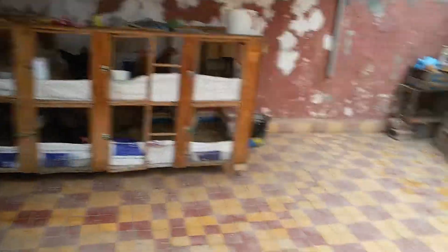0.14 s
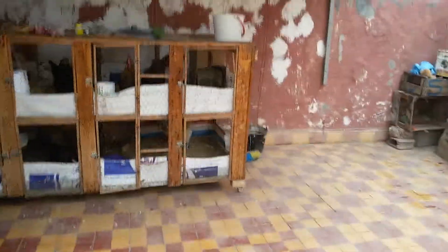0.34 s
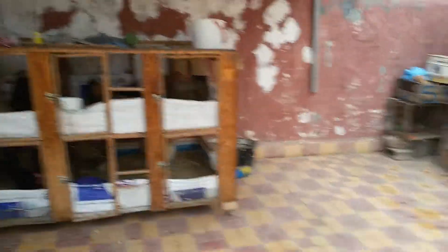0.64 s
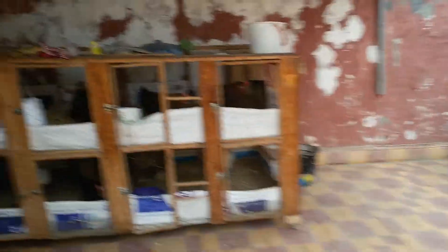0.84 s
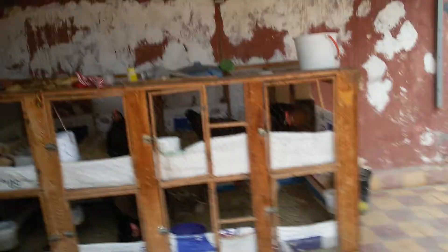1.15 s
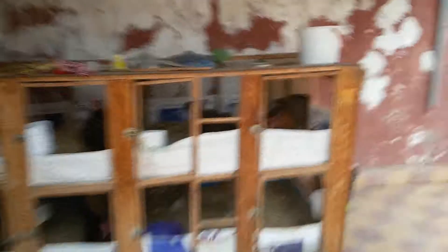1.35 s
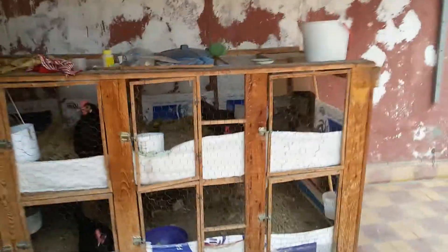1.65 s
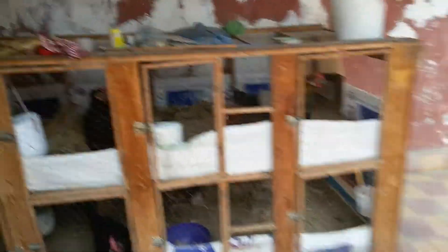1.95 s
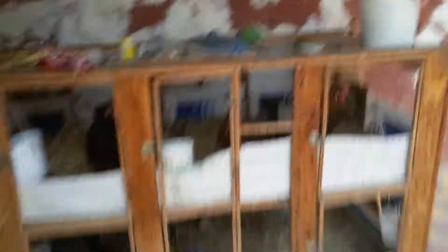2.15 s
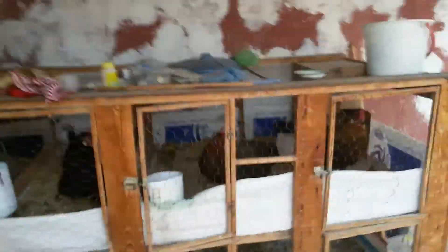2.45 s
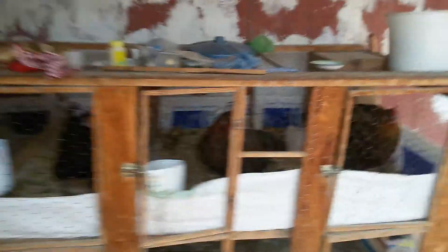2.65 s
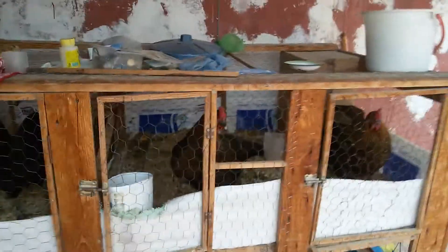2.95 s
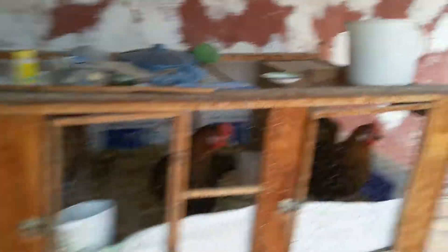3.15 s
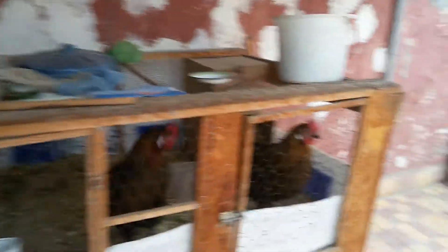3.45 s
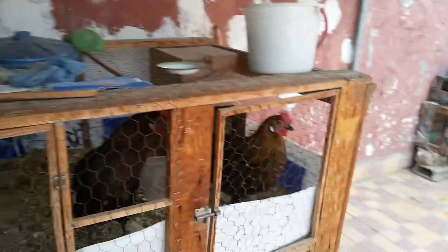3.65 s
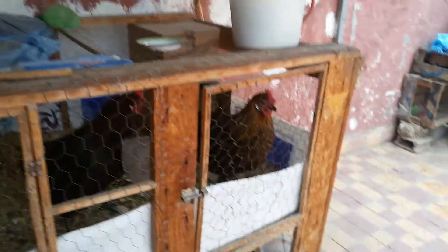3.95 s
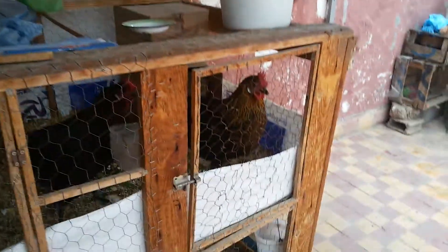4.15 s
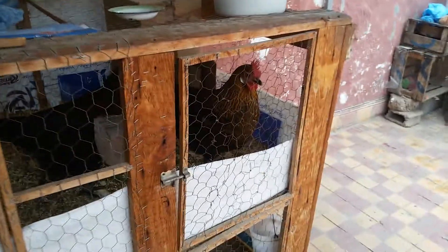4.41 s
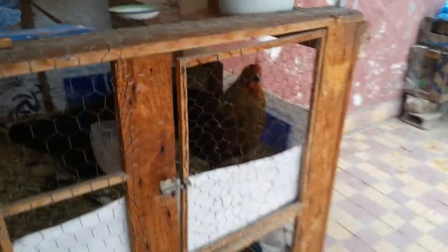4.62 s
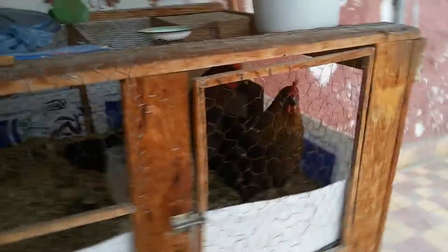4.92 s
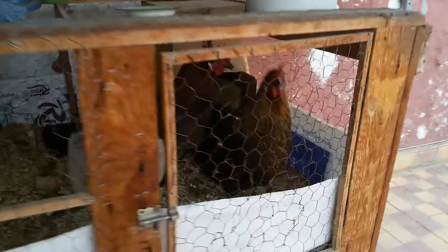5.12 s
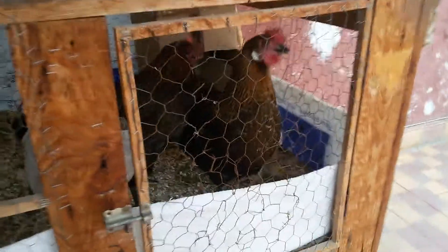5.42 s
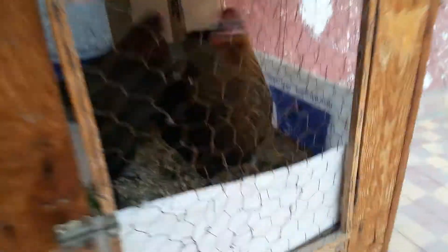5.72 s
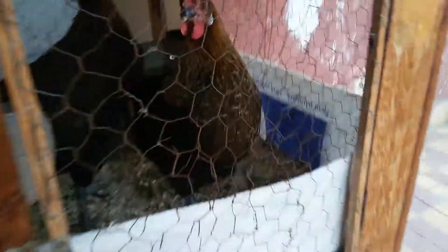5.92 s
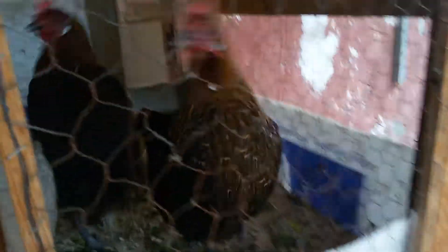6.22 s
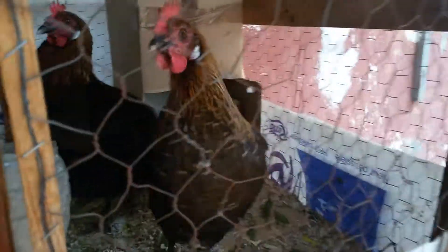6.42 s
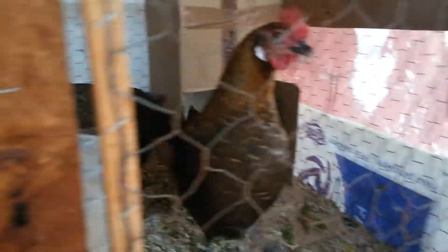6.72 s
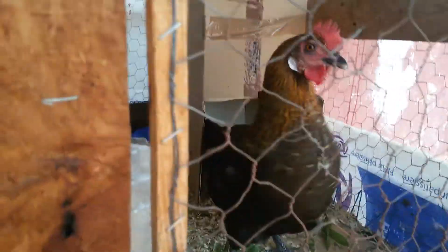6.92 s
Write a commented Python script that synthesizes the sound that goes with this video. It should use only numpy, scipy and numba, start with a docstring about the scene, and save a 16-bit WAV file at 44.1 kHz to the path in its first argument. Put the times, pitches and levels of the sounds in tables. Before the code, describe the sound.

Drawn-out, nasal hen calls get closer and stronger, with rough low clucks, litter scratches, small ticks and a faint distant tool whine behind.

```python
"""A hen in a wooden coop gives long rising calls, louder as the phone comes close: sine partials and breath.
A second hen clucks and growls lower: uneven pulses ring bands that stand for its throat and chest.
Feet scratch (grainy noise), beaks and claws tick (tiny noise bursts) and dull knocks fall (fading sines).
Behind them a far tool whines and thin hisses pass (narrow noise), a low drone wavers (one sine),
and a walled yard rumbles (many noise bands). Boards and walls echo the hens and feet."""
import sys
import numpy as np
from scipy import signal
from scipy.io import wavfile
from scipy.ndimage import uniform_filter1d
from numba import njit

SR = 44100
rng = np.random.default_rng(int(sys.argv[2]) if len(sys.argv) > 2 else 0)


def dump(signal):
    """Clip the signal to [-1, 1] and save it as 16-bit WAV at the path in sys.argv[1]."""
    limited = np.clip(np.atleast_2d(signal).T, -1, 1)
    pcm = np.round(limited * 32767).astype(np.int16)
    wavfile.write(sys.argv[1], SR, pcm)


N = 311771  # length in samples


def undb(db):
    """Turn decibels into a plain loudness factor."""
    return 10 ** (np.asarray(db) / 20)


def unit(x):
    """Scale a sound to an average (RMS) level of 1."""
    return x / np.sqrt(np.mean(x ** 2) + 1e-18)


def colour(table, hz):
    """Read the dB at a pitch from a (Hz, dB) table, joined on a log-frequency axis."""
    f, db = np.transpose(table)
    return np.interp(np.log(hz), np.log(f), db)


def span(table):
    """Give the stretch of samples a timed table covers, and its columns with one value a sample."""
    s, *columns = np.transpose(table)
    a, b = int(s[0] * SR), min(int(s[-1] * SR), N)
    return slice(a, b), [np.interp(np.arange(a, b) / SR, s, c) for c in columns]


@njit
def svf(x, hz, width):
    """Let through a band whose centre and width may move; the gain is 1 at the centre."""
    y, b, l = np.empty(len(x)), 0., 0.
    for i in range(len(x)):
        g, k = np.tan(np.pi * hz[i] / SR), width[i] / hz[i]
        v = (b + g * (x[i] - l)) / (1 + g * (g + k))
        b, l, y[i] = 2 * v - b, l + 2 * g * v, k * v
    return y


def band(x, hz, width):
    """Band-pass a sound; centre and width in Hz may be single numbers or one value a sample."""
    return svf(x, hz + 0 * x, width + 0 * x)


def walk(rate, n=N):
    """Wander at random: levels held 1 / rate seconds and smoothed twice, with a spread near 1."""
    k = max(int(SR / rate), 1)
    held = np.repeat(rng.standard_normal(n // k + 1), k)
    return 1.605 * uniform_filter1d(uniform_filter1d(held, k), k)[:n]


def fade(n, rise_s, fall_s):
    """Make a straight rise at the start and a straight fall at the end."""
    t = np.arange(n) / SR
    return np.clip(t / rise_s, 0, 1) * np.clip((n / SR - t) / fall_s, 0, 1)


def calls(flutter_db=.9, rasp_db=2.6, breath_db=-12.5):
    """Partials of the syrinx pulse; strong-weak pulses add lines halfway between; breath hisses once a cycle."""
    # The four lowest partials, one table a call.
    # Each row: time in seconds, then levels in dB of the 2nd, 1st, 3rd and 4th partial, before they flutter.
    partial_levels = [
        [(0.51, -49, -45, -56, -56), (0.524, -40, -40, -51, -55), (0.544, -43, -44, -45, -53),
         (0.568, -45, -49, -45, -58), (0.62, -38, -42.5, -47, -60), (0.678, -35.5, -37, -42, -65),
         (0.702, -36, -38, -41.5, -55), (0.768, -42, -39.5, -43, -60), (0.802, -39, -40.5, -38, -54),
         (0.882, -40, -41, -52, -42), (0.96, -46, -43, -47, -41), (0.98, -45, -43, -44, -63),
         (1.01, -49, -41, -45, -41), (1.03, -36, -51, -43, -45), (1.05, -41.5, -56, -43, -41),
         (1.1, -56, -38, -50, -54)],
        [(1.29, -39, -46, -57, -61), (1.312, -38, -46, -42, -51), (1.332, -37, -47, -49, -43),
         (1.358, -34, -35.5, -43, -47), (1.384, -38, -41, -34, -48), (1.41, -35, -42, -40, -48),
         (1.424, -35, -37, -40, -54), (1.456, -41, -42, -36, -41), (1.474, -29, -40, -41, -43),
         (1.492, -31, -42, -51, -58), (1.51, -42, -36, -49, -56)],
        [(2.018, -32, -36, -55, -59), (2.034, -27, -33, -45, -44.5), (2.06, -34.5, -37, -44, -41),
         (2.088, -29, -34, -44, -45.5), (2.148, -33.5, -31, -46, -39), (2.192, -26.5, -32.5, -41.5, -42),
         (2.232, -27.5, -30, -41, -55), (2.254, -27.5, -44, -46, -51), (2.274, -28.5, -32, -42, -57),
         (2.332, -25, -35, -41.5, -46), (2.356, -25.5, -34, -40, -39), (2.376, -34, -43, -45, -48),
         (2.404, -26, -53, -40.5, -51), (2.436, -23, -32.5, -43, -50), (2.474, -25, -57, -44, -50),
         (2.5, -30, -53, -45, -56)],
        [(2.793, -35, -38, -47, -54), (2.803, -25, -35, -41, -41), (2.819, -26, -29.5, -43, -35),
         (2.845, -40, -46, -44, -49.5), (2.875, -32.5, -37, -41, -41), (2.937, -35, -29.5, -37, -44),
         (2.955, -38, -32, -36, -49), (2.977, -31, -33, -44, -40), (3.003, -22.5, -41, -36.5, -36.5),
         (3.041, -25, -51, -36, -34.5), (3.069, -30, -34.5, -39.5, -40), (3.137, -32, -44, -35, -39.5),
         (3.227, -25.5, -35, -36, -36), (3.247, -26.5, -36, -37.5, -38), (3.277, -27, -34.5, -34.5, -36.5),
         (3.31, -19, -33, -40, -46)],
        [(3.505, -31, -33, -50, -50), (3.521, -22.5, -47, -39, -39), (3.539, -38, -44, -38, -30.5),
         (3.555, -26.5, -46, -37, -39), (3.581, -20.5, -42, -38, -35), (3.605, -29.5, -47, -32, -36),
         (3.643, -22, -48, -31, -39), (3.669, -21.5, -44, -30, -32), (3.689, -19.5, -39, -39, -37),
         (3.705, -23, -35, -44, -42), (3.72, -37, -42, -48, -47)],
        [(4.115, -30, -47, -47, -53), (4.129, -24.5, -40, -37.5, -30), (4.145, -34, -44, -46, -27.5),
         (4.167, -28, -32.5, -36, -40), (4.201, -36.5, -46, -39, -31.5), (4.221, -25.5, -38, -35, -36.5),
         (4.327, -28, -36.5, -30.5, -34.5), (4.359, -22.5, -33, -30.5, -43.5), (4.417, -16.5, -41, -28.5, -37),
         (4.483, -22, -39.5, -31.5, -42), (4.511, -19, -35.5, -36, -35.5), (4.547, -19.5, -30.5, -30.5, -32.5),
         (4.575, -19, -32.5, -35, -31), (4.667, -17.5, -33, -30.5, -33.5), (4.677, -22, -32, -39, -38),
         (4.71, -39, -29, -46, -38)],
        [(4.955, -26, -38, -53, -45), (4.965, -20, -31, -38, -36.5), (4.981, -17.5, -44, -28, -32.5),
         (5.001, -28, -44, -38, -34.5), (5.035, -21, -35, -37, -30), (5.069, -27, -32, -30.5, -41),
         (5.117, -20, -31.5, -29, -36), (5.131, -25, -33, -25, -28), (5.157, -27.5, -32, -27.5, -35),
         (5.195, -14.5, -27.5, -35, -31.5), (5.229, -15.5, -27.5, -26, -31), (5.265, -18.5, -31, -29.5, -28),
         (5.281, -13.5, -34, -23, -28), (5.305, -22, -26.5, -46, -34.5), (5.32, -33, -36, -47, -45)],
        [(5.555, -24, -37, -49, -42), (5.563, -21.5, -34.5, -36, -30.5), (5.583, -27.5, -40, -35.5, -29.5),
         (5.607, -25, -38, -41, -29), (5.625, -27, -37, -34, -29), (5.645, -33, -35, -30, -30),
         (5.673, -24.5, -34, -31, -28), (5.713, -31, -36, -33, -28), (5.741, -26.5, -34, -32, -36),
         (5.769, -27.5, -30, -32, -26.5), (5.805, -41.5, -37, -31, -30), (5.829, -23, -38, -34, -38.5),
         (5.84, -30, -52, -45, -41)],
        [(6.142, -22, -35, -40, -36), (6.16, -19, -34, -36, -24.5), (6.194, -24.5, -29, -37, -25),
         (6.214, -20.5, -34, -32, -25.5), (6.246, -23.5, -31.5, -28.5, -29.5), (6.272, -26, -32, -30.5, -29),
         (6.36, -25, -39, -28, -29), (6.386, -15.5, -36, -31, -24.5), (6.458, -18.5, -33.5, -28, -26.5),
         (6.478, -33.5, -39.5, -30.5, -28), (6.498, -7.5, -36, -24, -24.5), (6.526, -19, -32.5, -28, -27),
         (6.55, -17, -35, -27, -29), (6.564, -18, -31.5, -31, -23.5), (6.598, -16, -30.5, -28.5, -29),
         (6.615, -24, -23, -21, -21)],
    ]
    # The steady part of the pitch, one table a call. Each row: time in seconds, pitch in Hz.
    pitches = [
        [(0.55, 535.6), (0.584, 515), (0.6, 548), (0.61, 525.3), (0.704, 522.4), (1.048, 542.3), (1.08, 524)],
        [(1.31, 507), (1.434, 532), (1.49, 534)],
        [(2.035, 510), (2.101, 534), (2.225, 546.3), (2.271, 572.7), (2.363, 585), (2.417, 615), (2.48, 624)],
        [(2.81, 531.6), (2.876, 532.6), (2.884, 522.3), (3.044, 554.6), (3.072, 577.7), (3.09, 569),
         (3.285, 590.6)],
        [(3.53, 543.7), (3.552, 566.4), (3.57, 584), (3.596, 582), (3.618, 571.4), (3.695, 582)],
        [(4.135, 526.8), (4.219, 555), (4.227, 546.2), (4.399, 561.3), (4.463, 568.4), (4.521, 595.6),
         (4.67, 583.3)],
        [(4.975, 540), (5.045, 560.8), (5.189, 595), (5.29, 595)],
        [(5.575, 534), (5.701, 571.4), (5.803, 576.4), (5.82, 569)],
        [(6.165, 535.2), (6.383, 585.8), (6.595, 593.2)],
    ]
    # How bright and how uneven each call is, against its effort. Each row: upper partials in dB at the start
    # and at the end, half-way lines in dB at the start and at the end.
    brightness = [(-21, -6, -17, -5), (-18, -2, -16, -8), (-7.5, 3.5, -20, -27), (-5, -4, -11, -9),
                  (-5.5, -8, -34, -19), (-11, 1.5, -17.5, -23), (-2, -5, -22, -23.5), (-3, -3, -22, -4),
                  (-1, -5.5, -21, -12.5)]
    # Beak resonance of each call, strongest in the seventh.
    # Each row: centre in Hz at the start, centre in Hz at the end, boost in dB.
    beaks = [(3300, 3000, 8), (3300, 3300, 9), (4050, 4100, 10), (3880, 4100, 7.5), (3980, 3840, 11),
             (3890, 3590, 12), (3710, 3900, 16), (3800, 3960, 9.5), (3850, 3780, 8)]
    # How the throat colours the upper partials and half-way lines. Each row: frequency in Hz, gain in dB.
    throat = [(250, -43.5), (900, -11), (1450, -4), (2100, 4.5), (2950, -23.5), (3500, -11.5), (4200, -13),
              (4700, -8.5), (5500, -26.5), (7000, -26.5), (9300, -35.5), (10500, -67)]
    onset_drop_hz, onset_s = 70.3, 0.008  # each call starts sharp and drops onto its pitch
    end_rise_hz, end_s = 32.4, 0.013  # and breaks upward as it stops
    break_db, break_s = 14, .03  # the voice turns hoarse as it stops
    halfway_fall_db = 13  # half-way lines weaken per step away from the 2.5th
    wander_db = 1.7  # each low partial swells and sinks a little on its own
    attack_s, release_s = 0.010, 0.016

    out = np.zeros(N)
    for call, pitch, ends, (*beak, beak_db) in zip(partial_levels, pitches, brightness, beaks):
        at, (second, first, third, fourth) = span(call)
        effort = 10 * np.log10(undb(2 * third) + undb(2 * fourth))  # 3rd and 4th partials together
        n = len(second)
        t = np.arange(n) / SR
        hz = np.interp(call[0][0] + t, *np.transpose(pitch))
        hz = hz + onset_drop_hz * np.exp(-t / onset_s) + end_rise_hz * np.exp((t - t[-1]) / end_s)
        upper, alternate = np.linspace(ends[::2], ends[1::2], n).T
        upper = effort + upper
        flutter = flutter_db * walk(140.1, n)  # the low partials flutter together
        halfway = effort + np.median(second - effort) + alternate
        beak_hz = np.linspace(*beak, n)
        waver = .001 * walk(45, n) + .005 * walk(260, n)  # small shakes of the pitch
        cycles = np.cumsum(hz * (1 + waver)) / SR

        voice = np.zeros(n)
        for k in np.arange(.5, 17.5, .5):
            if k > 4.5:  # the upper partials rasp, each on its own
                db = upper + 0.49 * alternate * (k % 1 > 0) + colour(throat, k * hz) + rasp_db * walk(200, n)
                db += beak_db * np.exp(-((k * hz - beak_hz) / 280) ** 2)
            elif k % 1:  # half-way lines among the low partials
                db = halfway - halfway_fall_db * abs(k - 5 / 2)
                db = db + colour(throat, k * hz) + rasp_db * walk(37.0, n)
            else:
                db = [first, second, third, fourth][int(k) - 1]
                db = db + np.sqrt(k) * flutter + wander_db * walk(60, n)
            phase = 2 * np.pi * k * cycles + rng.uniform(-1.3, 1.3)
            voice -= undb(db) * np.sqrt(2) * np.cos(phase)

        puff = rng.standard_normal(n) * (1 + np.sin(2 * np.pi * cycles))
        breath = unit(band(band(puff, 3750, 590), 4100, 1200)) + 0.023 * unit(band(puff, 3500, 2900))
        low_breath = unit(band(band(puff, 2 * hz, 310), 2 * hz, 830))
        low_breath = low_breath + 0.53 * unit(band(band(puff, 700, 1200), 700, 1200))
        hoarse_db = second - 22.0 + break_db * np.exp((t - t[-1]) / break_s)
        voice = voice + undb(upper + breath_db) * breath + undb(hoarse_db) * low_breath
        out[at] += fade(n, attack_s, release_s) ** 2 * voice
    return out


def growls(noise=0.6, patchy_db=4):
    """Uneven pulses of the second hen ring two throat bands and, faintly, the chest."""
    # The long growl. Each row: time in seconds, pulse rate in Hz, level in dB, roughness from 0 to 1,
    # lower throat band in Hz, upper throat band in Hz.
    long_growl = [(2.84, 183, -39, 0.7, 734, 890), (2.87, 181.2, -33, 0.88, 730, 880),
                  (2.91, 176, -36, 0.4, 700, 900), (2.96, 167.5, -38, 0, 660, 960),
                  (3.02, 160.6, -34.5, 0.08, 510, 980), (3.18, 165.5, -33, 0.04, 514, 910),
                  (3.24, 178.5, -30.5, 0.58, 600, 895), (3.27, 214.6, -31, 0.82, 595, 830),
                  (3.31, 233, -28, 0.75, 675, 947), (3.355, 240, -30.5, 0.75, 730, 935),
                  (3.39, 234, -32, 0.5, 646, 955), (3.42, 229.4, -32, 0.88, 640, 924),
                  (3.49, 226.6, -31, 0.8, 692, 867), (3.54, 200.6, -35.5, 0.98, 647.4, 794),
                  (3.6, 198.5, -29, 0.75, 700, 834), (3.645, 200.1, -35.5, 0.58, 735, 890),
                  (3.67, 199, -42, .6, 600, 800), (3.73, 198, -45, .6, 590, 790)]
    # Short clucks. Each row: start in seconds, length in seconds, level in dB, pulse rate in Hz at the start,
    # pulse rate in Hz at the end, roughness from 0 to 1, lower throat band in Hz.
    short_clucks = [(0.306, 0.11, -43, 201.3, 213, 0.9, 770), (1.276, 0.044, -40.5, 137, 131.7, 0.76, 626),
                    (1.363, 0.098, -40.5, 137.4, 141.2, 0.54, 657), (1.474, 0.065, -34, 269.5, 290, 1, 600),
                    (1.535, 0.043, -40, 229, 248, 0.14, 685), (1.654, 0.064, -36.5, 269.5, 261, 0.84, 605),
                    (1.836, 0.097, -37, 236, 266.3, 0.74, 623), (3.753, 0.14, -31, 215.8, 306, 0.4, 670),
                    (3.883, 0.079, -33.5, 214.8, 239.6, 0.85, 655)]
    ring_hz = 150  # width of the first filter of each throat band

    out = np.zeros(N)
    for growl in [long_growl] + [cluck(*row) for row in short_clucks]:
        at, (hz, db, rough, low_hz, high_hz) = span(growl)
        n, rough = len(hz), np.clip(rough, 0, 1)
        waver = rough * (.045 * walk(160, n) + .008 * walk(25, n))
        cycles = np.cumsum(hz * (1 + waver)) / SR
        weak = 4 * rough * (np.floor(cycles) % 2)  # a rough voice goes strong-weak
        pulses = np.diff(np.floor(cycles), prepend=0) * undb(3 * rough * walk(90, n) - weak)
        pulses = np.sqrt(SR / hz) * pulses + noise * rough * rng.standard_normal(n)
        low, high = (band(band(pulses, f, ring_hz), f, 260) * undb(patchy_db * rough * walk(30, n))
                     for f in (low_hz, high_hz))
        chest = band(band(pulses, 245.0, 110), 310, 97)
        voice = low - high + 1.1 * chest
        voice = voice + .22 * band(band(pulses, 1170, 300), 1170, 300)
        voice = voice + .08 * band(band(pulses, 1800, 700), 1800, 700)
        out[at] += undb(db) * unit(voice)
    return out


def cluck(start, length, db, hz0, hz1, rough, low_hz):
    """Controls of one cluck: it swells, holds and fades while the pulse rate glides."""
    rise, fall, edge_db = 0.11, 0.2, -1  # rise and fall are shares of the length
    upper_throat_hz = 844
    shape = [(0, edge_db), (rise, 0), (1 - fall, 0), (1, edge_db)]
    return [(start + u * length, hz0 + u * (hz1 - hz0), db + d, rough, low_hz, upper_throat_hz)
            for u, d in shape]


def burst(start, length, db, hz, width, grit_db):
    """Dense grains of uneven size in one band, swelling and fading."""
    n = int(max(length, .005) * SR)
    grains = rng.standard_normal(n) * undb(grit_db * walk(430, n))
    out, a = np.zeros(N + n), int(start * SR)
    out[a:a + n] = undb(db) * unit(band(grains, hz, width)) * fade(n, 0.1 * length, .5 * length)
    return out[:N]


def scratches():
    """Feet scratch the litter: many small rubs blur into grainy noise, bright with a weaker low part."""
    # Each row: start in seconds, length in seconds, level in dB before fading and further filtering.
    strokes = [(1.638, 0.12, -42.5), (1.895, 0.046, -38.5), (2.86, 0.048, -31.5), (3.217, 0.037, -34.5),
               (5.422, 0.046, -43.5), (5.684, 0.17, -32.5), (6.27, 0.17, -36.5), (6.775, 0.016, -33.5),
               (6.796, 0.039, -36.5), (6.85, 0.017, -45)]
    bright_hz = 4500
    out = np.zeros(N)
    for s, length, db in strokes:
        bright = burst(s, length, db, bright_hz, 2600, 1.6)
        out += band(band(bright, bright_hz, 4000), 2700, 6000)
        out += burst(s, length, db - 10, 1300, 1600, 3)
    return out


def ticks():
    """Beaks and claws hit wood and wire: a click with fast-dying noise, over a lower knock of the board."""
    # Each row: time in seconds, peak level in dB, centre of the bright part in Hz.
    taps = [(.159, -34, 3500), (0.262, -27, 4950), (0.316, -27, 2490), (0.394, -32, 3460),
            (0.594, -24.5, 1500), (0.908, -29, 3484), (1.014, -30, 4570), (1.198, -27, 2670),
            (1.621, -32, 2970), (1.765, -30, 5500), (1.913, -43, 4470), (2.059, -29, 5500),
            (2.617, -27, 1950), (2.636, -24, 5100), (2.685, -31, 2984), (2.949, -30, 3800),
            (3.083, -43, 4478), (3.942, -30.5, 5430), (4.298, -23, 3970), (6.03, -23, 4500),
            (6.032, -30, 3200), (6.034, -31.5, 2500), (7.0028, -24.5, 4400)]
    width_hz, decay_s, knock_hz = 2400, .0012, 1100
    out = np.zeros(N)
    t = np.arange(int(.15 * SR)) / SR
    for s, db, hz in taps:
        hit = (rng.standard_normal(len(t)) + 4 * (t == 0)) * np.exp(-t / decay_s)
        bright = band(band(hit, hz, width_hz), hz, width_hz)
        board = band(band(hit, knock_hz, knock_hz), knock_hz, knock_hz)
        tick = bright + .6 * board
        a = int(s * SR)
        out[a:a + len(t)] += (undb(db) * tick / np.abs(tick).max())[:N - a]
    return out


def knocks():
    """A few dull knocks: each is one sine that dies away."""
    # Each row: time in seconds, level in dB before fading, pitch in Hz, seconds to die away by 60 dB.
    thuds = [(.59, -3, 810, 0.0085), (2.91, -28, 98, 0.21), (3.941, -11, 200, 0.035),
             (6.299, -32, 256, 0.071)]
    out = np.zeros(N)
    t = np.arange(int(.15 * SR)) / SR
    for s, db, hz, t60 in thuds:
        a = int(s * SR)
        ring = np.sin(2 * np.pi * hz * t) * np.exp(-np.log(1000) * t / t60)
        out[a:a + len(t)] += undb(db) * ring * fade(len(t), .008, .01)
    return out


def echoes(x):
    """Scattered reflections: short and bright from the coop boards, long and dull from the yard walls."""
    # First the coop boards, then the yard walls. Each row: seconds to die away by 60 dB,
    # level in dB of the whole tail, centre in Hz, width in Hz.
    reflections = [(.18, -14, 2600, 4000), (.42, -27, 1300, 1600)]
    t = np.arange(int(.6 * SR)) / SR
    tail = 0
    for t60, db, hz, width in reflections:
        scatter = rng.standard_normal(len(t)) * np.exp(-np.log(1000) * t / t60)
        scatter = band(scatter * fade(len(t), 0.00077, 0.013), hz, width)
        tail = tail + undb(db) * scatter / np.sqrt(np.sum(scatter ** 2))
    return signal.fftconvolve(x, tail)[:N]


def whine():
    """A far power tool slows under load; distance smears its whine into narrow flickering noise bands."""
    # One table a strand. Each row: time in seconds, whine pitch in Hz, level in dB before it flickers.
    strands = [
        [(0, 4840, -43.5), (.22, 4920, -41), (.4, 4450, -40.5), (.6, 4425, -47.5), (.9, 4420, -42.5),
         (1.2, 4470, -40.5), (1.7, 4844, -40.5), (2.6, 5070, -40), (3.2, 5190, -37.5), (3.8, 5040, -39.5),
         (4.12, 5040, -40), (4.3, 5010, -50), (4.9, 5230, -49), (5.55, 5260, -72)],
        [(0, 5210, -35), (.1, 5370, -60), (.2, 5220, -50), (.33, 4870, -35)],
        [(4.4, 4540, -67), (4.72, 4570, -46.5), (4.95, 4830, -49.5), (5.4, 4550, -55), (5.9, 4450, -52.5),
         (6.12, 4590, -50.5), (6.7, 5050, -49.5), (7.2, 4670, -59)],
    ]
    width = 266  # Hz
    out = np.zeros(N)
    for strand in strands:
        at, (hz, db) = span(strand)
        noise = rng.standard_normal(len(hz))
        tone = unit(band(band(noise, hz, width), hz, 0.68 * width))
        tone = tone + 0.26 * unit(band(noise, hz, 0.19 * width))
        out[at] += undb(db + 1.3 * walk(30, len(hz))) * tone * fade(len(hz), .001, .06)
    return out


def hisses():
    """Thin high hisses: short stretches of grainy noise, filtered twice around one centre."""
    # Each row: start in seconds, length in seconds, level in dB before fading and the second filter,
    # centre in Hz.
    puffs = [(0.518, 0.11, -56, 11400), (1.227, 0.45, -52, 13210), (5.295, 0.32, -51, 12900),
             (6.763, 0.097, -44, 13080)]
    return sum(band(burst(s, length, db, hz, 1900, 0.86), hz, 2200) for s, length, db, hz in puffs)


def drone():
    """One low sine tone whose pitch and level waver."""
    # Each row: time in seconds, pitch in Hz, level in dB, both before the random waver.
    path = [(0, 112.3, -51), (2.85, 98.05, -50.5), (3.25, 104.4, -43), (3.37, 122.4, -44), (3.75, 125, -49),
            (4.15, 97, -47.5), (4.6, 104.3, -41), (4.7, 125.9, -46), (5.4, 137.8, -47), (7.07, 128.8, -55)]
    _, (hz, db) = span(path)
    cycles = np.cumsum(hz * (1 + 0.023 * walk(15))) / SR
    return undb(db + 2.0 * walk(24)) * np.sqrt(2) * np.sin(2 * np.pi * cycles)


def yard():
    """Third-octave bands of town noise, each flickering alone while neighbours share a slow swell."""
    # Balance of the noise; only the differences matter. Each row: frequency in Hz, level in dB per Hz.
    balance = [(25, -22.5), (40, -6), (58, 5), (75, -7), (125, -4), (250, -11), (450, -16), (1200, -15.5),
               (2600, -26.5), (4200, -21), (5600, -26), (7000, -56.5), (9000, -48.5), (14500, -39)]
    # Slow swells; only the changes matter.
    # Each row: time in seconds, then rumble, low traffic, middle and air, each in dB.
    swells = [(0, -51, -41.5, -55.5, -53), (1.6, -45, -42.5, -52.5, -53), (2.6, -53, -42.5, -55, -54),
              (3.099, -46, -40.5, -50.5, -55.5), (3.5, -49.5, -45.5, -48.5, -54),
              (4.199, -47.5, -41.5, -55, -53), (4.8, -50.5, -40.5, -55.5, -56), (5.9, -51, -41.5, -57, -55),
              (7.07, -54, -42, -56.5, -55.5)]
    s, *columns = np.transpose(swells)
    rumble, traffic, middle, air = (np.interp(np.arange(N) / SR, s, c) - np.mean(c) for c in columns)
    out = 0
    for hz in 28 * 2 ** np.arange(0, 9.1, 1 / 3):
        swell = rumble if hz < 100 else traffic if hz < 350 else middle if hz < 2000 else air
        noise = unit(band(band(rng.standard_normal(N), hz, hz / 3), hz, hz / 3))
        flicker = 2.35 * walk(6.3) + 1.0 * (hz < 500) * walk(2.244)  # the lows also drift more slowly
        db = colour(balance, hz) + 10 * np.log10(hz) + swell + flicker  # wider bands hold more noise
        out = out + undb(db) * noise
    return undb(-37.5) * unit(out)


def scene():
    """Add the hens and feet, their echoes, and the background."""
    hens = calls() + growls()
    feet = scratches() + ticks() + knocks()
    background = whine() + hisses() + drone() + yard()
    return (hens + feet + echoes(hens + 3.34 * feet) + background)[None]


def record(dry):
    """The phone's microphone rounds the loudest peaks, fades below 38 Hz and above 10 kHz, and cuts the top."""
    dry = np.tanh(1.3 * dry) / 1.3
    dry = signal.sosfilt(signal.butter(N=2, Wn=[38, 10000], btype="band", fs=SR, output="sos"), dry)
    return signal.sosfilt(signal.ellip(8, .2, 70, 14700, fs=SR, output="sos"), dry)  # steep cut at 14700 Hz


dry = scene()
out = record(dry)
dump(out)
```